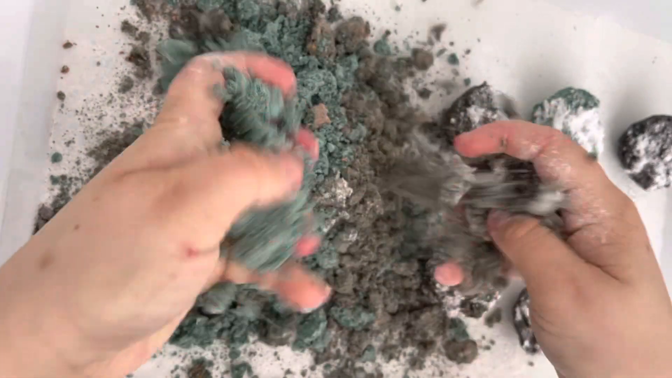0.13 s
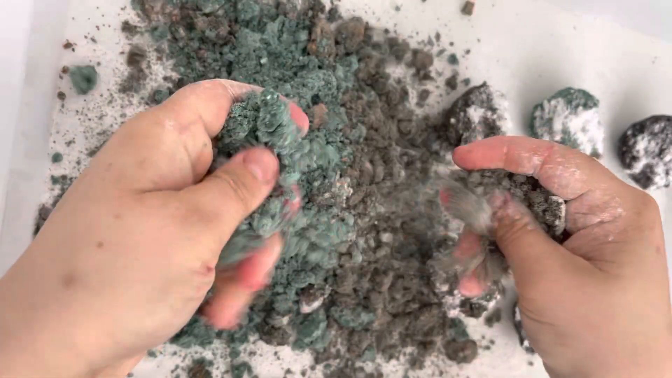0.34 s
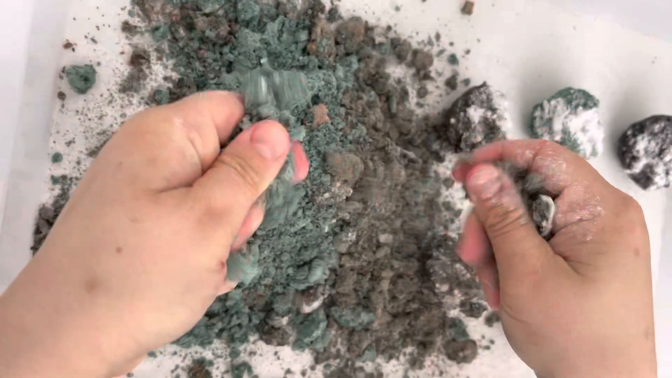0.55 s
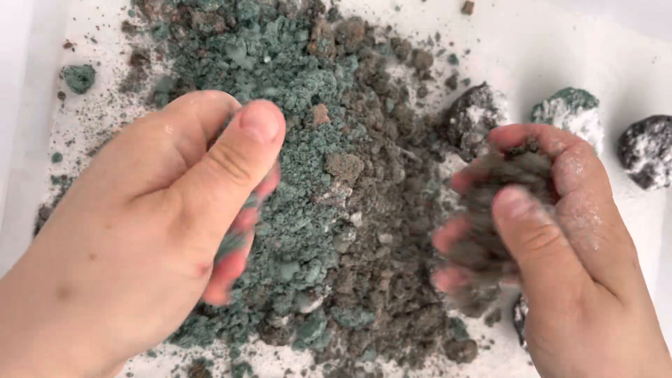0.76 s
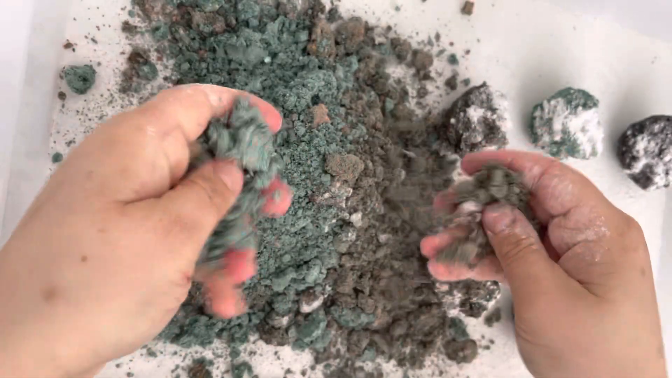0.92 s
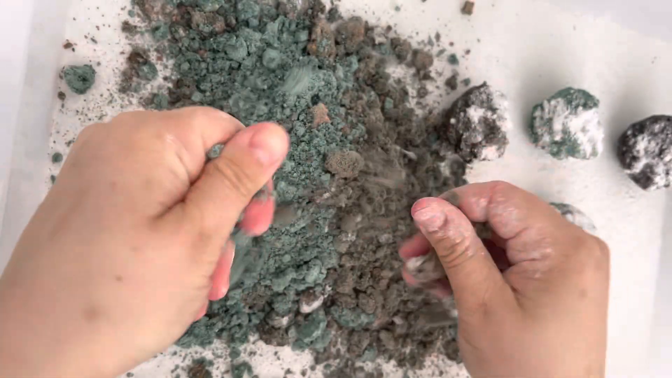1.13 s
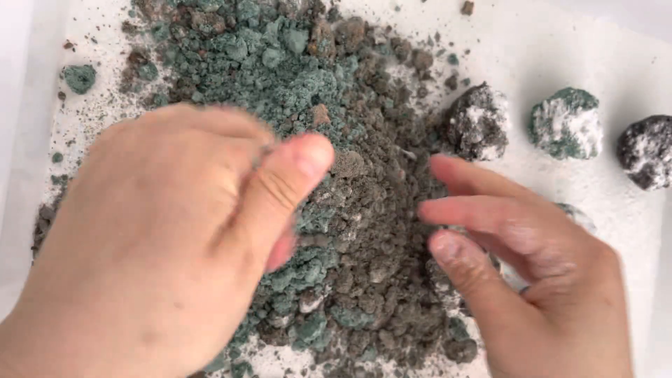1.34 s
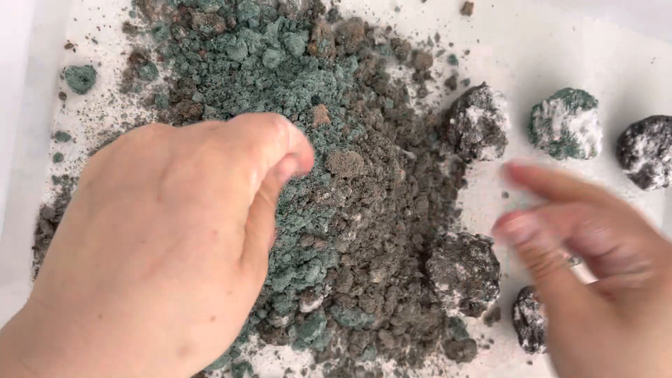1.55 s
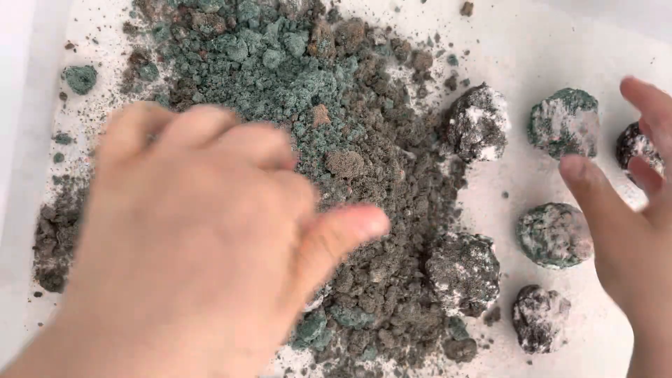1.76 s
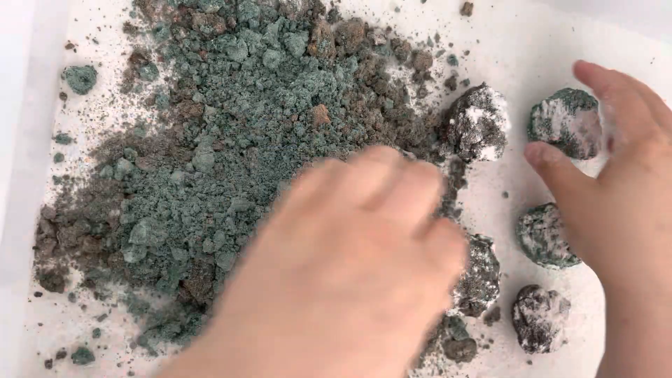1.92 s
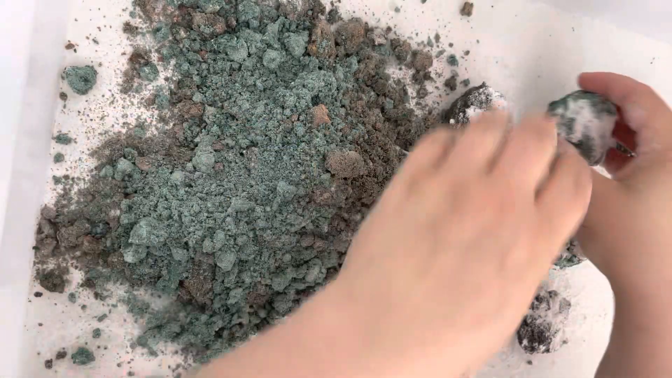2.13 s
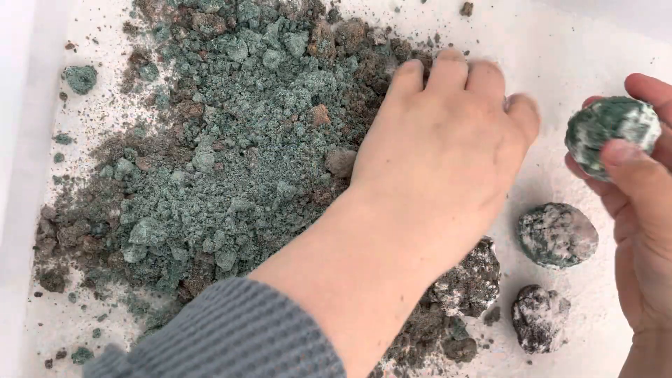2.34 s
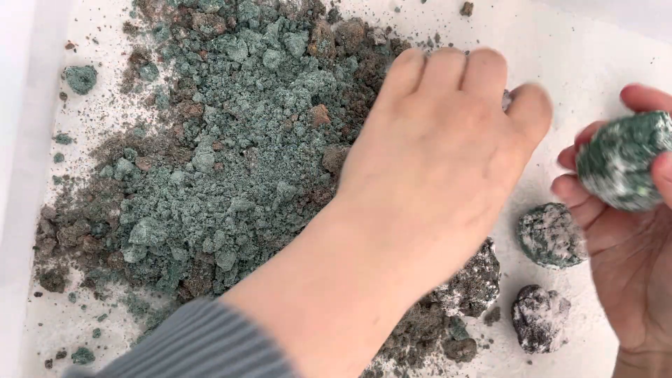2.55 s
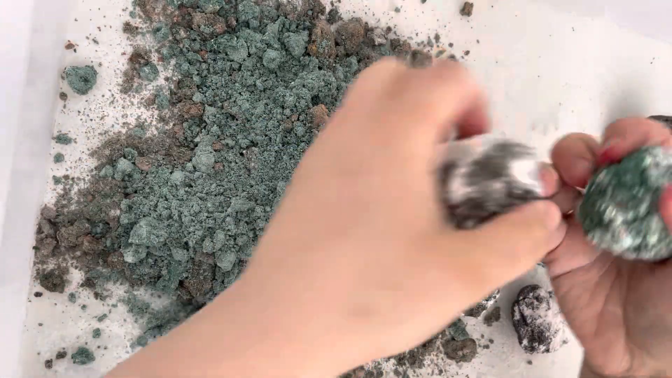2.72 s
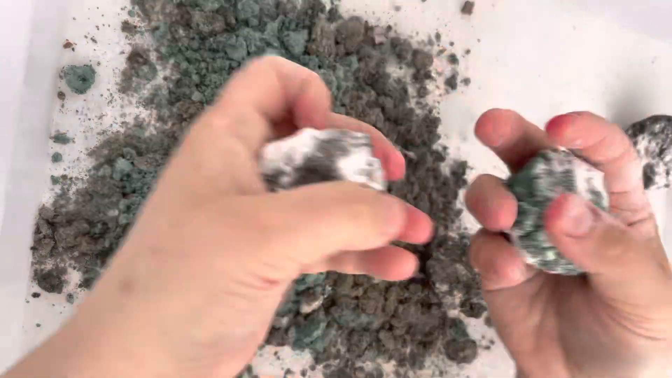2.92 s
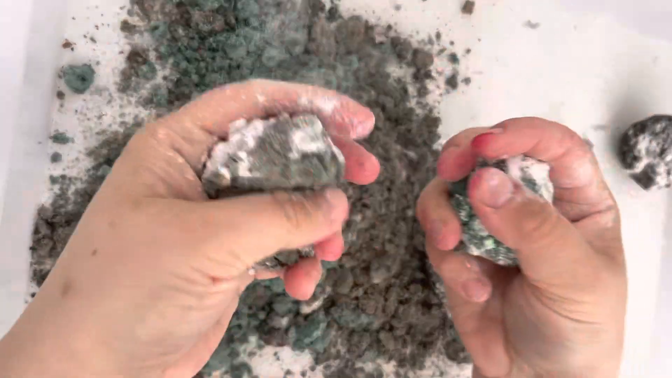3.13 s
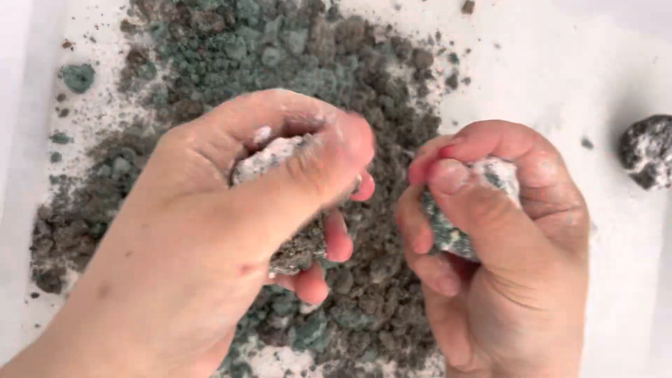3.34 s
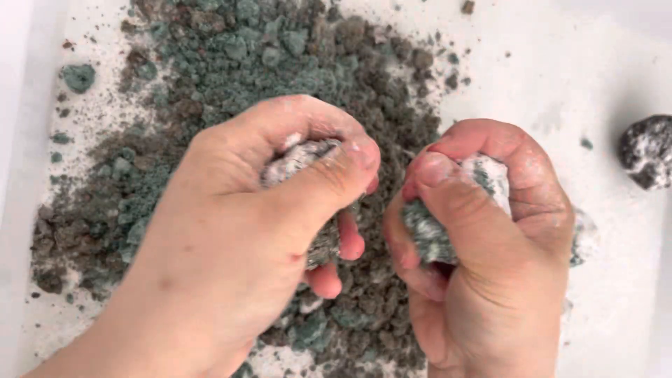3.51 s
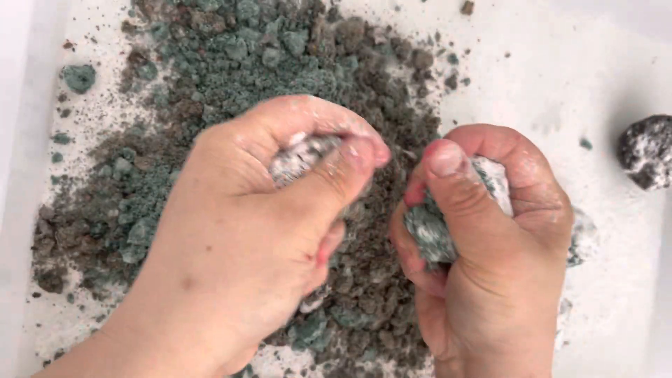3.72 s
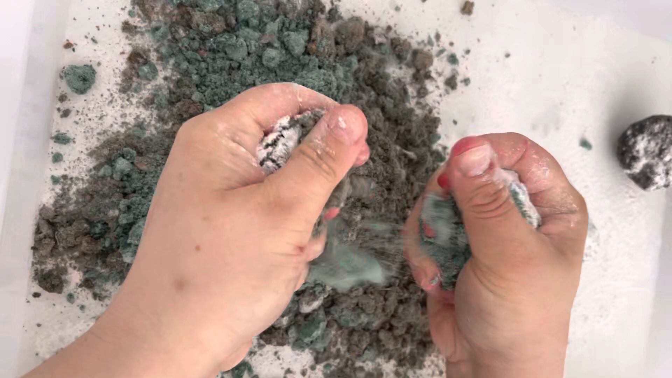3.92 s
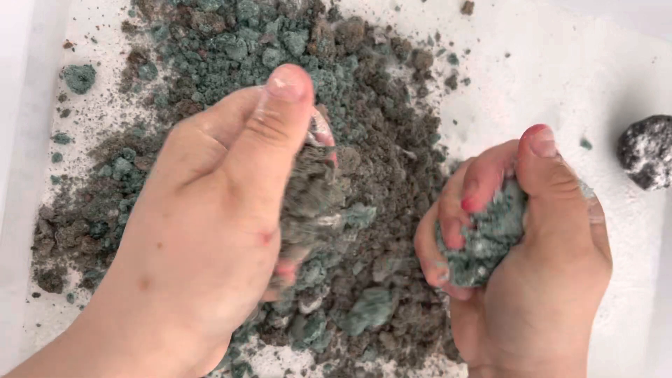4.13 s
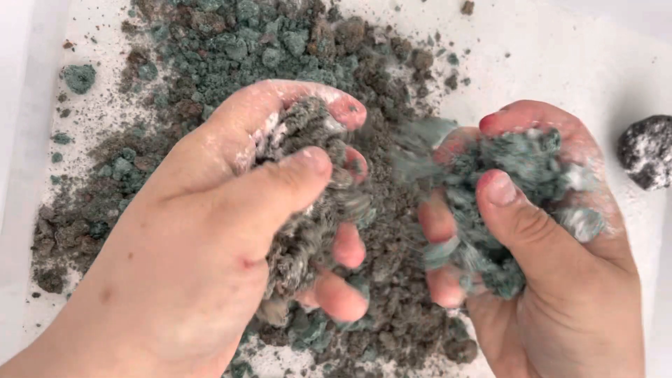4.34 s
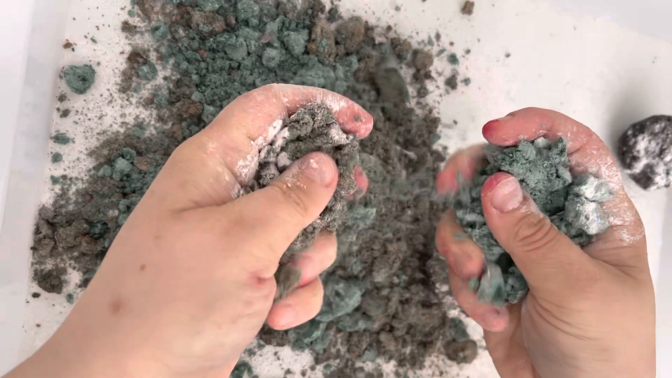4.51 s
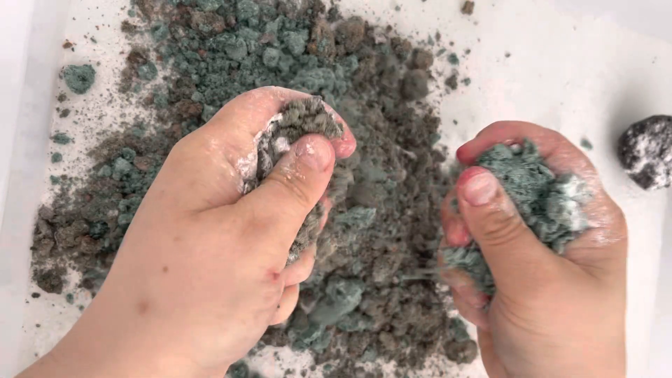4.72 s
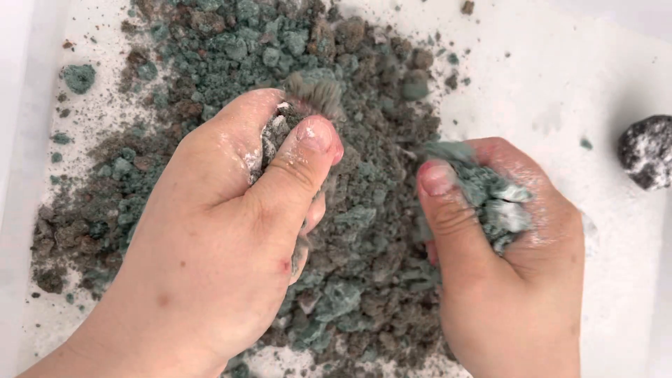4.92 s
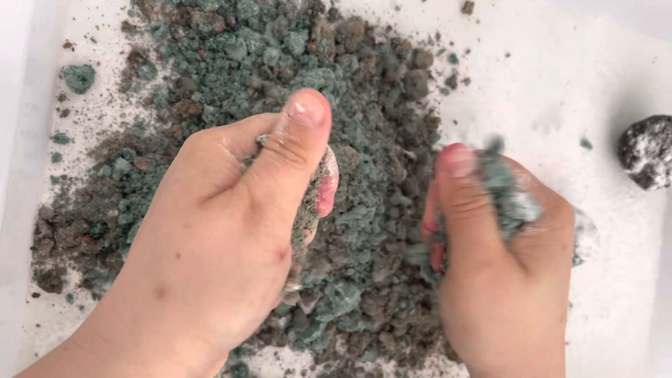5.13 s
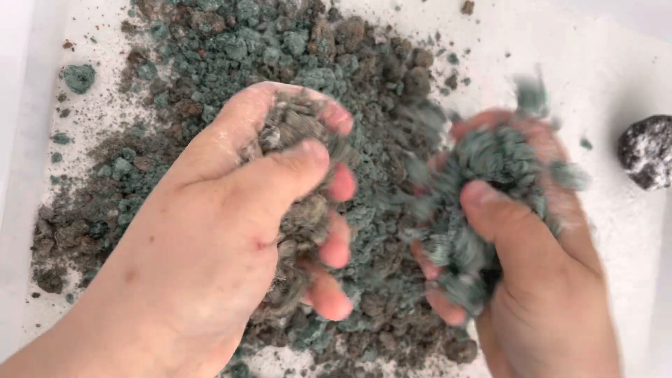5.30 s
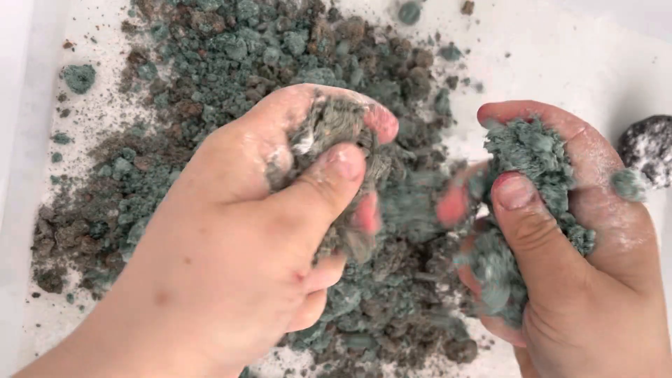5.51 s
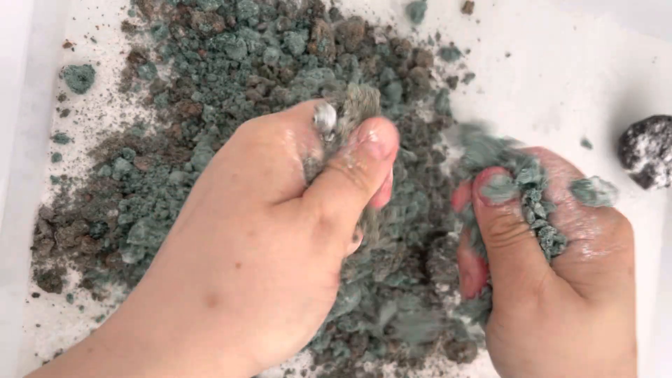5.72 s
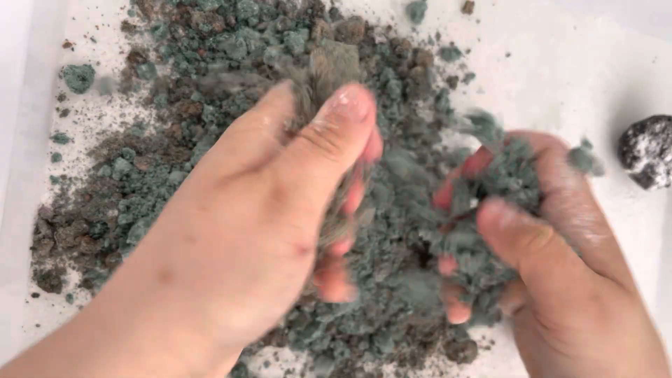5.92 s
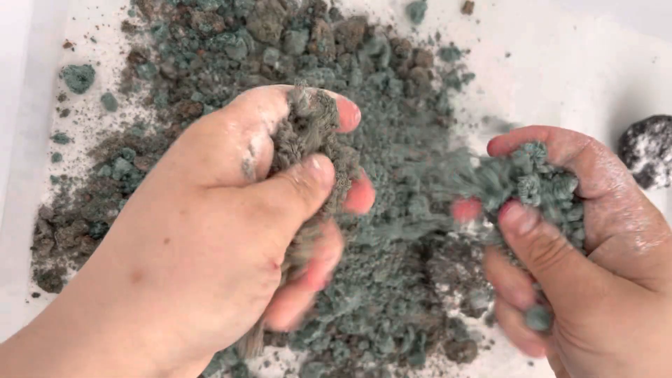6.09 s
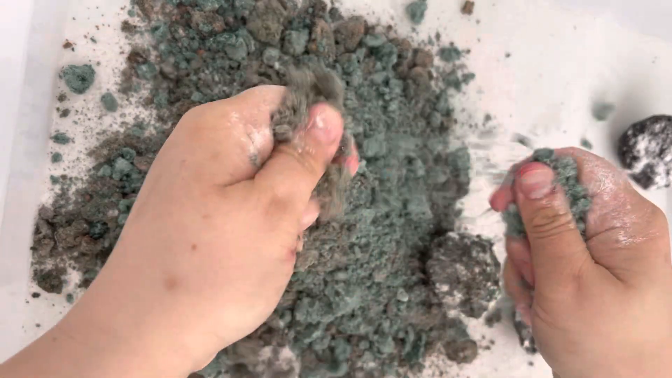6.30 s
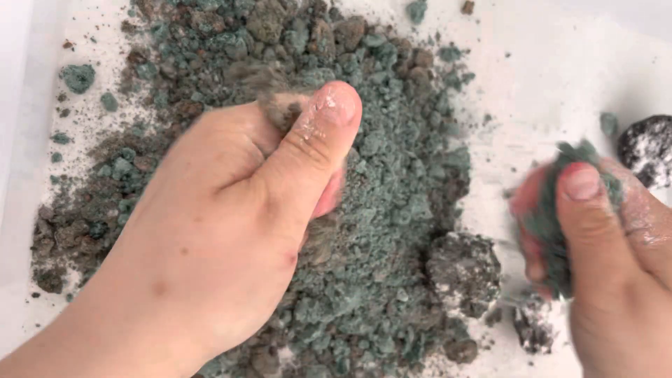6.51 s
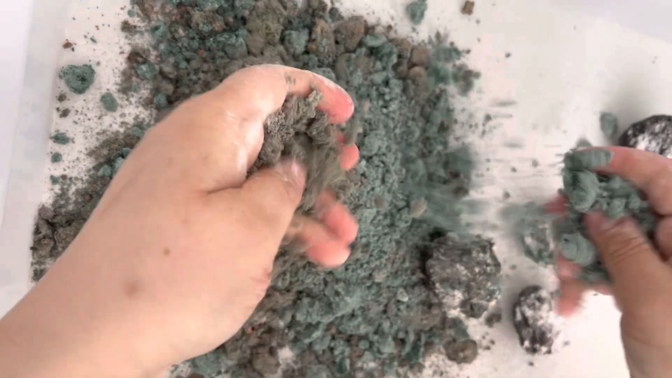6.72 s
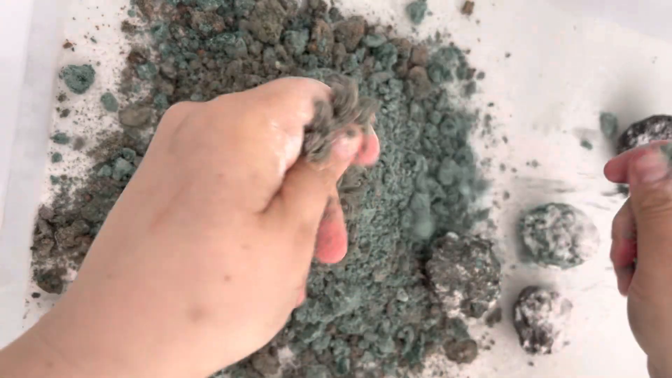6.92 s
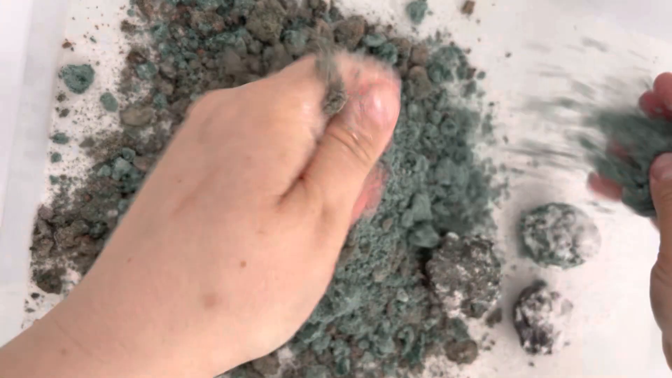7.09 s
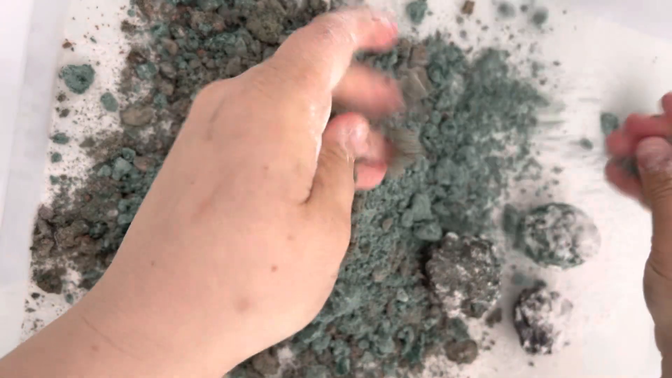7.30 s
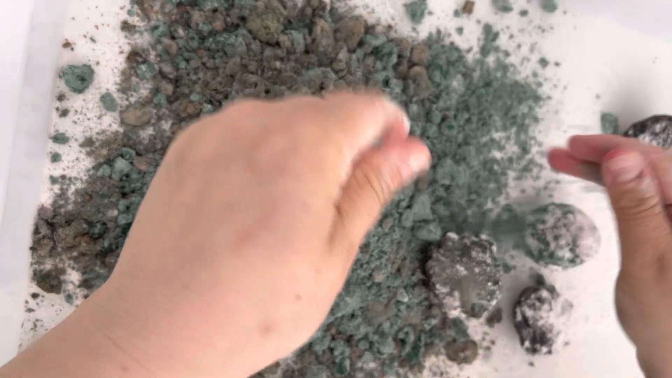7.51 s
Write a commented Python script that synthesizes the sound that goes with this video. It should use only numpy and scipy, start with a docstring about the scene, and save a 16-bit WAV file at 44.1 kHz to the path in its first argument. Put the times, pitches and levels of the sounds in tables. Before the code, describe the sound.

Two hands crush balls of dry, brittle foam close to a phone in a quiet room. Soft powdery crumbling and light taps fade into a near-silent pause with faint brushing. Then sharp snaps build quickly into a crackling collapse, followed by waves of gritty crunching. Finally heavy clumps thud onto a shallow tray and loose lumps patter down, with a low rumble of handling beneath.

```python
"""Powdery hiss, crunches and sharp snaps: two hands crush balls of dry floral foam close to a phone in a quiet room.
Shaped random grains make the hiss and crunch; noise bursts, coloured by brief tones, make the snaps.
Lumps and clumps drop on the flat tray below: noise taps and short blows over decaying sine modes.
Crumbs patter and the hands rumble low behind. Two microphone ports hear it out of step, with a faint room tail."""
import sys
import numpy as np
from scipy import signal
from scipy.fft import rfft, irfft, next_fast_len
from scipy.io import wavfile
from scipy.ndimage import uniform_filter1d

SR = 44100
rng = np.random.default_rng(int(sys.argv[2]) if len(sys.argv) > 2 else 0)


def generate_wav(signal):
    """Clip the signal to [-1, 1] and save it as 16-bit WAV at the path in sys.argv[1]."""
    frames = np.transpose(np.atleast_2d(signal))
    scaled = np.clip(frames, -1, 1) * 32767
    pcm = np.round(scaled).astype(np.int16)
    wavfile.write(sys.argv[1], SR, pcm)


N = 332955
TIME = np.arange(N) / SR  # s

# Levels are ahead of the trims in the functions; a peak is the rms of the loudest 3 ms.
# Colours give relative gain; t60 is the time to fall by 60 dB; tilt is treble gain per octave.

# squeezes, brushes and rummaging of the fingers in the foam:
# (t/s, attack/s (at least 0.001), hold/s, powder hiss level/dB, coarse crunch level/dB, buried grinding level/dB)
STROKES = [(0.0, 0.00069, 0.07, -63.5, -64.5, -61), (0.166, 0.13, 0.33, -56.5, -58.5, -61.5),
           (0.714, 0.08, 0.059, -73.5, -79, -74), (0.816, 0.21, 0.07, -53.5, -57, -79),
           (1.136, 0.046, 0.046, -66, -63.5, -60), (1.264, 0.026, 0.0091, -61, -76, -77),
           (1.374, 0.0077, 0.013, -62, -74, -96), (1.406, 0.17, 0.02, -57.5, -71.5, -92),
           (1.951, 0.03, .005, -79, -74.5, -73), (2.108, 0.075, 0.097, -77.5, -76.5, -77),
           (2.311, 0.042, 0.014, -74.5, -66, -76), (2.84, 0.1, 0.032, -59, -57, -67),
           (3.011, 0.022, 0.015, -55.5, -54.5, -59), (3.13, 0.051, 0.072, -77, -66.5, -62),
           (3.3, 0.035, .025, -82, -81, -64), (3.514, 0.063, 0.026, -60, -59.5, -57),
           (3.61, 0.067, 0.014, -52, -49, -43), (3.735, 0.057, 0.045, -51, -46.5, -44),
           (3.876, 0.038, 0.16, -55, -51, -53.5), (4.008, 0.063, 0.11, -58.5, -53.5, -70),
           (4.173, 0.059, 0.13, -60.5, -55, -64.5), (4.365, 0.07, 0.08, -64.5, -58, -85),
           (4.441, 0.071, 0.24, -57, -51, -49.5), (4.774, 0.081, 0.021, -51, -49.5, -51.5),
           (4.904, 0.038, 0.012, -53, -49.5, -48), (4.995, 0.039, 0.097, -55.5, -52.5, -57.5),
           (5.156, 0.069, 0.56, -61.5, -60.5, -64), (5.375, 0.16, 0.068, -53.5, -51, -47.5),
           (5.606, 0.082, 0.042, -50, -52.5, -52), (5.843, 0.12, 0.11, -67.5, -63, -66),
           (5.992, 0.057, 0.19, -59, -57, -49.5), (6.101, 0.11, 0.21, -54.5, -56, -52.5),
           (6.51, 0.071, 0.062, -66, -71.5, -88), (6.64, 0.07, 0.21, -57, -59, -62.5),
           (6.91, 0.087, 0.018, -54.5, -65, -61), (7.087, 0.041, 0.021, -62, -67, -61.5),
           (7.172, 0.026, 0.015, -71, -56, -45.5), (7.222, 0.11, 0.07, -59.5, -90, -76)]
RELEASE_T60_S = 0.41  # the crumbling dies away as the fingers ease
# loose crumbs between strokes: (hiss level/dB, crunch level/dB, grinding level/dB)
IDLE_DB = (-84.5, -87, -88)
# the fresh ball gives way ever faster, then is flat: time of the peak, swell before it, decay after it
CAVE_S, CAVE_SWELL_DB_PER_S, CAVE_T60_S = 3.485, 168, 0.16
# the cave-in at its peak: (hiss level/dB, crunch level/dB, grinding level/dB)
CAVE_DB = (-45, -46, -32.5)
# colour of thin cells breaking: (f/Hz, gain/dB)
POWDER = [(300, -90), (1200, -23), (2500, -18), (4200, 6), (6400, 6.5), (8000, 13.5), (10500, 15),
          (11300, 10), (12300, -10.5), (13500, -39)]
# colour of thicker walls breaking: (f/Hz, gain/dB)
CRUNCH = [(150, 2.5), (350, -4), (700, -15.5), (1000, -11.5), (1400, -1), (1800, 2), (2500, 4), (3300, -2),
          (6000, -1.5), (12000, -44)]
# colour of the crust: (f/Hz, gain/dB)
CRUST = [(150, -32.5), (600, -5.5), (1000, -20), (1700, -1.5), (2500, -1), (3500, -0.5), (5000, -1.5),
         (6500, 3), (10500, 2), (13000, -25.5)]
# colour of thick walls, muffled by the fingers: (f/Hz, gain/dB)
WALL = [(150, -22.5), (550, -21), (1080, -14.5), (1330, 2.5), (1550, -3), (1800, 0.5), (2100, -3),
        (2500, -3), (3300, -15), (6500, -12), (10500, -9), (13000, -44)]

# loudest snaps of the crust: (t/s, peak level/dB, tilt/(dB/octave), brief tone mixed into the snap f/Hz)
SNAPS = [(1.0213, -36.5, -6, 2360), (1.0682, -42, -10, 2500), (1.1338, -40, -8.5, 2400),
         (2.777, -33.5, 0.5, 2900), (3.041, -37.5, 2, 2170), (3.087, -33, 0.5, 2260),
         (3.1706, -31.5, 0, 2280), (3.1905, -35, -3.5, 2640), (3.2139, -26.5, -6.5, 2320),
         (3.228, -48, -10, 2000), (3.2544, -48, 6, 1900), (3.2591, -34, -2, 1870), (3.273, -42, -7, 2320),
         (3.2845, -26, -1, 1800), (3.3244, -45, 8, 1540), (3.351, -27.5, -4.5, 1830),
         (3.3786, -24, -3, 1770), (3.406, -31, 3, 2050), (3.412, -43, -5, 2000), (3.42, -42, 1, 2020),
         (3.426, -28.5, 2, 2530), (3.434, -36, -6, 2400), (3.4774, -24.5, 1, 1310),
         (3.4887, -25.5, -1, 1290), (3.605, -34.5, -3.5, 1340), (3.637, -34, 6, 1360),
         (3.644, -36, 7, 1830), (3.743, -32.5, -4, 1830), (3.934, -27, -1, 1790), (4.053, -32, 5, 1830),
         (4.5806, -35.5, -8, 1270), (4.71, -35, -7, 1750), (4.7388, -27, -10, 1810), (4.8625, -31, 4, 1260),
         (4.899, -29.5, 3, 1550), (4.965, -29.5, -0.5, 1800), (5.0313, -29, -4.5, 1790),
         (5.4671, -26, -10.5, 2500), (5.477, -31.5, -10.5, 2500), (5.553, -33, -6, 2270),
         (5.6989, -28, -8, 1390), (6.0233, -35.5, -8.5, 3150), (6.083, -39, -6, 2400),
         (6.0985, -28, -19, 1950)]
TONE_DB = -6  # brief tone against the crack
# thick walls giving way inside the fist: (t/s, peak level/dB, tilt/(dB/octave))
CRUNCHES = [(3.445, -36, 5), (3.452, -30, -5), (3.461, -31.5, 4), (3.468, -27, 0), (3.479, -31, -6),
            (3.488, -31.5, -12), (3.646, -40.5, 0), (3.688, -36.5, 1), (3.707, -40, 5), (3.728, -47, 8),
            (3.765, -42, 3), (3.82, -33.5, -1.5), (3.843, -39, 5), (3.851, -39, 0), (3.906, -41, 6),
            (3.971, -40, 15), (4.006, -39, 14), (4.035, -39, 4), (4.112, -38, 6), (4.148, -37.5, 4.5),
            (4.176, -39, 1.5), (4.329, -48, -1), (4.411, -52, -2), (4.43, -48, -1), (4.455, -47.5, 1),
            (4.486, -48, -8), (4.494, -40, -4), (4.516, -35, -0.5), (4.525, -40, -1), (4.544, -37, 1.5),
            (4.566, -39, -6), (4.6, -38.5, -6), (4.609, -40, 0), (4.645, -43, -10), (4.659, -37.5, 2),
            (4.682, -42, -1), (4.705, -33, -5), (4.752, -44, -10), (4.772, -44, 0), (4.818, -41, 1),
            (4.854, -36.5, 0), (4.875, -39.5, 2), (4.943, -44, 3), (5.106, -57, 4), (5.147, -40.5, 9),
            (5.386, -44, -3.5), (5.644, -39, 0)]
# broken halves knocking together inside the fist: (t/s, peak level/dB, f/Hz)
KNOCKS = [(3.088, -41, 587), (3.286, -41, 560), (3.362, -43, 650), (3.383, -45, 596), (3.454, -30, 600),
          (3.608, -39, 566), (3.645, -30, 645), (3.656, -36, 620), (3.744, -37, 590), (3.847, -35.5, 533),
          (3.909, -38, 680), (4.7415, -43, 600), (4.965, -43, 550), (5.033, -31, 610)]
# packed core creaking in the fist: (t/s, attack/s, hold/s, level/dB)
CREAKS = [(3.304, 0.039, 0.04, -51.5), (3.653, 0.027, 0.041, -68), (3.805, 0.035, 0.027, -48.5),
          (3.919, 0.013, 0.015, -46.5), (3.996, 0.023, 0.041, -52)]
# colour of the packed core: (f/Hz, gain/dB)
CORE = [(80, -21), (200, -2), (330, 9.5), (550, -0.5), (800, -3.5), (2000, -39), (8000, -73)]
# fingers brushing the foam and picking up a ball: (t/s, length/s, level/dB)
SCRAPES = [(1.658, 0.068, -66.5), (1.997, 0.031, -67), (2.462, 0.07, -61), (2.522, 0.18, -56),
           (2.662, 0.043, -47.5), (2.683, 0.15, -57.5), (2.764, 0.036, -45.5), (2.793, 0.028, -61),
           (2.816, 0.077, -59)]
# colour of skin on crust: (f/Hz, gain/dB)
RASP = [(600, -43), (1500, -12.5), (2200, 0), (2800, 3.5), (3800, -4), (5000, -2), (8000, 2.5),
        (10500, 6.5), (13000, -35)]

# lumps landing on the tray: (t/s, peak level/dB, low ring peak level/dB, hardness as tilt/(dB/octave))
LUMPS = [(0.039, -58, -54.5, -9), (0.134, -53, -52, 19.5), (0.178, -51, -64, 6), (0.228, -40, -48.5, -12),
         (0.243, -44, -52, -4), (0.444, -43.5, -74, 15), (0.6, -41.5, -54, 23.5), (0.75, -33.5, -56.5, -3),
         (0.797, -54, -76, 6), (0.828, -45, -55, -2), (1.022, -32.5, -76, 17.5), (1.066, -40.5, -77, 15),
         (1.133, -41.5, -52, 11.5), (1.256, -49.5, -54.5, 1), (3.492, -35, -62, -5),
         (5.718, -30.5, -53, -10), (5.911, -46, -58, 5), (5.969, -46.5, -64, -3), (6.024, -32.5, -54, -2.5),
         (6.204, -26, -49, -7), (6.26, -32.5, -71, -1), (6.268, -40, -49, -2), (6.275, -29, -46, -9),
         (6.306, -47, -66, -6), (6.366, -43.5, -57, 18), (6.426, -39.5, -52, 0), (6.445, -41, -55, 6),
         (6.67, -42.5, -49, -27), (6.714, -42.5, -56, -4), (6.727, -35, -49, 2.5), (6.846, -45, -46, 1),
         (6.863, -36.5, -45, -3), (6.899, -32, -67, 6), (6.99, -43, -62, -1), (7.109, -47.5, -69, -3),
         (7.144, -41.5, -64, 14.5), (7.157, -37, -53, 8), (7.209, -26.5, -43, -5), (7.222, -36, -56, 9),
         (7.231, -39, -58, 0), (7.241, -38, -43, -8), (7.256, -37, -48, 8), (7.289, -28, -39.5, 4.5),
         (7.302, -28, -46, -8), (7.34, -31, -68, 8), (7.411, -43.5, -74, 4.5), (7.478, -47.5, -54.5, -7),
         (7.494, -45.5, -51, 12.5)]
REBOUND_S, REBOUND_DB = 0.0081, -7  # typical wait until broken pieces land again; start of it against the first
LUMP_BODY_DB = 2.5  # lift of the low mids in every tap
# heavy clumps landing and collapsing on the tray: (t/s, peak level/dB, contact f/Hz,
# delay of second blow/s, its peak level/dB, slump peak level/dB, low ring peak level/dB)
CLUMPS = [(5.468, -25, 1154, 0.0046, -23, -42, -49), (5.7012, -20.5, 1300, 0.005, -28.5, -29, -35),
          (6.0988, -15, 1500, 0.0075, -24, -23.5, -32)]
SECOND_PITCH = 0.89  # the broken clump lands softer: pitch against the first contact
SLUMP_S, SLUMP_HZ = 0.01, 520  # then its mass settles with a dull thud, this long after the first contact
SETTLE_DB, SETTLE_T60_S = -5.5, 0.053  # its crumbs run out: against the tabled slump level; decay
# hands and heavy clumps nudging the tray: (t/s, peak level/dB)
NUDGES = [(0.116, -54), (0.271, -51), (1.31, -47.5), (2.379, -47), (4.007, -55), (4.504, -50.5)]
# colour of a tap on the tray: (f/Hz, gain/dB)
TAP = [(30, -57), (100, 5), (300, -1), (430, -6), (550, -8), (800, -5), (1100, 2.5), (1500, 2.5),
       (1900, -9), (2600, -16), (3400, -31), (8000, -49), (13000, -77)]
# low modes of the tray, before tilt and scatter: (f/Hz, level/dB, t60/s)
TRAY = [(137.5, 4.5, 0.33), (195.5, -5, 0.22), (239.6, -8.5, 0.3), (288.8, -12, 0.34), (349.2, -16.5, 0.32),
        (438, -13.5, 0.18), (529.7, -10.5, 0.17)]
# quick upper modes of its floor, before tilt and scatter: (f/Hz, level/dB, t60/s)
PANEL = [(413, -4.5, 0.09), (551.5, 5, 0.087), (745, 3.5, 0.11), (883, 8.5, 0.05), (1042, 8, 0.057),
         (1167, 7, 0.057), (1245, 1, 0.093), (1398, 3.5, 0.049), (1552, -2.5, 0.057), (1900, -11, 0.021)]

# crumbs that trail each lump and clump: level against its tabled peak, before the patter's trim
SHOWER_DB, SHOWER_ATTACK_S, SHOWER_T60_S = -28.5, 0.016, 0.48
# colour of pattering crumbs: (f/Hz, gain/dB)
PATTER = [(30, -35), (100, -21), (200, -5), (340, 3.5), (430, -4), (540, 5), (700, 0.5), (850, 2.5),
          (1020, -3), (1350, 3.5), (1900, -8.5), (3500, -22.5), (9000, -52)]
# a hand pressing on the heap: (t/s, attack/s, hold/s, level/dB)
PRESSES = [(1.578, 0.022, 0.052, -55)]
# colour of the shifting heap: (f/Hz, gain/dB)
HEAP = [(40, -8), (150, -3), (300, -1.5), (400, 0.5), (500, 4), (620, -7.5), (900, -12), (1300, -13),
        (3000, -28), (6000, -54)]
# low rumble of the hands over time: (t/s, level/dB)
HANDLING = [(0.0, -46), (0.45, -59), (1.05, -56), (1.42, -50), (1.8, -55), (2.05, -56), (2.4, -53),
            (2.92, -56), (3.2, -47), (4.2, -54), (4.4, -61), (4.8, -56), (5.4, -52.5), (5.74, -51),
            (5.95, -54.5), (6.12, -57), (6.6, -52), (6.89, -52.5), (7.55, -55)]
# colour of that rumble: (f/Hz, gain/dB)
RUMBLE = [(22, -35.5), (36, -4), (64, 2.5), (82, 1.5), (100, -3), (118, -4.5), (138, 2), (165, -11.5),
          (250, -16), (500, -31), (1200, -38.5), (8000, -67)]
# phase by which the left microphone port leads the right: (f/Hz, phase/rad)
PORTS = [(0, 0), (150, 0.08), (300, 0.4), (600, 1.15), (780, 0.9), (1000, 0.35), (1380, -0.1), (2240, 0.1),
         (2930, 1.0), (3700, 0.4), (4570, 1.8), (5340, 5.4), (5680, 6.2), (6200, 6.3), (8350, 9.2),
         (9560, 9.6), (11800, 12.2), (12500, 12.7)]
TOP_HZ = 13200  # upper edge of the phone's band


def crumbling(hiss_gain, crunch_gain):
    """Thin cells break as dense hiss, thick walls as sparser crunch and dull clots, crust flakes as crackles."""
    powder = unit(colour(grains(rate=20000, spread_db=2.0, surge_db=1.5, surge_rate=670), POWDER))
    crunch = unit(colour(grains(rate=3200, spread_db=2.5, surge_db=2.5, surge_rate=170), CRUNCH))
    flakes = grains(rate=170, spread_db=2, surge_db=2.5, surge_rate=25)
    # each flake tears for a few milliseconds
    tearing = signal.oaconvolve(np.abs(flakes), fade(TIME[:300], t60=0.004))[:N]
    crackle = undb(-4) * unit(colour(tearing * rng.standard_normal(N), CRUST))
    clots = undb(-5) * unit(colour(grains(rate=260, spread_db=1.5, surge_db=3, surge_rate=40), WALL))
    coarse = crunch + crackle + clots
    return undb(6.0) * powder * hiss_gain + undb(-0.85) * coarse * crunch_gain


def effort():
    """Gains of hiss, crunch and grinding over time: idle crumbs, finger strokes and cave-in add in power."""
    power = undb(IDLE_DB)[:, None] ** 2 + np.outer(undb(CAVE_DB), cave_in()) ** 2
    for s, attack, hold, hiss_db, crunch_db, grind_db in STROKES:
        push = stroke(s, attack, hold, RELEASE_T60_S)
        power += np.outer(undb([hiss_db, crunch_db, grind_db]) ** 2, push ** 2)
    return np.sqrt(power)


def cave_in():
    """Each broken wall overloads the next, so the collapse swells steadily in dB and ends abruptly."""
    since = TIME - CAVE_S
    swell = undb(CAVE_SWELL_DB_PER_S * np.minimum(since, 0))
    return swell * fade(np.maximum(since, 0), CAVE_T60_S)


def snaps():
    """A crack runs through the crust in a few milliseconds and sheds a little grit; a brief tone colours each snap."""
    out, t = np.zeros(N), TIME[:2048]
    onset = (1 - np.exp(-t / 0.00052)) ** 2
    shape = onset * (fade(t, t60=0.0048) + undb(-26) * fade(t, t60=0.06))  # crack, then grit
    for s, db, treble_db, hz in SNAPS:
        crack = colour(rng.standard_normal(len(t)) * shape, CRUST, treble_db)
        tone = shape * np.sin(2 * np.pi * hz * t)
        add(out, s, to_peak(unit(crack) + undb(TONE_DB) * unit(tone), db - 4.0))
    return out


def crunches():
    """Thick walls buckle with short, dull cracks; all share nearly the same hollow colour, slightly varied at random."""
    out, t = np.zeros(N), TIME[:2048]
    onset = (1 - np.exp(-t / 0.0008)) ** 2
    shape = onset * (fade(t, t60=0.008) + undb(-30) * fade(t, t60=0.05))
    for s, db, treble_db in CRUNCHES:
        shift = 2 ** (.04 * rng.standard_normal())
        hollow = [(hz * shift, gain_db) for hz, gain_db in WALL]
        crack = colour(rng.standard_normal(len(t)) * shape, hollow, treble_db)
        add(out, s, to_peak(crack, db - 2))
    return out


def knocks():
    """Broken halves meet in a dull knock, damped at once by the palm."""
    out, t = np.zeros(N), TIME[:1500]
    for s, db, hz in KNOCKS:
        add(out, s, to_peak(contact(hz, t), db - 7.5))
    return out


def creaks():
    """Under a hard squeeze the packed core slips in low, uneven jerks."""
    slips = unit(colour(grains(rate=450, spread_db=-3.5, surge_db=2.0, surge_rate=76), CORE))
    return slips * sum(undb(db) * stroke(s, attack, hold, t60=0.071) for s, attack, hold, db in CREAKS)


def scrapes():
    """Skin drags over the rough crust: a short, bright rasp."""
    gain = np.zeros(N)
    rasp = unit(colour(grains(rate=12000, spread_db=1.5, surge_db=2.5, surge_rate=200), RASP))
    for s, length, db in SCRAPES:
        across = 2 * (TIME - s) / length - 1  # -1 to 1 over the stroke
        gain += undb(db) * np.sqrt(np.maximum(1 - across ** 2, 0))
    return rasp * gain


def lumps():
    """Each lump taps the tray, breaks up and scatters, and the tray rings low."""
    out, t, long_t = np.zeros(N), TIME[:6000], TIME[:16000]
    # every lump has some body, a hard one more treble
    body = [(200, 0), (450, LUMP_BODY_DB), (800, LUMP_BODY_DB), (1300, 0)]
    for s, db, ring_db, bright_db in LUMPS:
        again = t - REBOUND_S * rng.uniform(.6, 1.4)
        rebound = undb(REBOUND_DB) * (again > 0) * fade(np.abs(again), t60=0.02)
        landing = fade(t, t60=0.015) + rebound
        scatter = undb(-9) * fade(t, t60=0.065) + undb(-31) * fade(t, t60=0.19)
        pieces = rng.standard_normal(len(t)) * undb(4 * walk(rate=400)[:len(t)])
        tap = unit(colour(pieces * (landing + scatter), TAP))
        panel = modes(PANEL, t, tilt_db=4, vary_db=4.5, vary_pitch=0.018) * (1 - np.exp(-t / 0.0011))
        tap += undb(-3.5) * unit(panel)
        tap = bend(colour(tap, body, bright_db), lag=0.003454)
        add(out, s - .001, to_peak(tap, db - 5.5))
        add(out, s, to_peak(tray_ring(long_t, tilt_db=2.5), ring_db))
    return out


def clumps():
    """A clump hits, breaks, hits again and slumps; each softer blow rings lower modes of the tray."""
    out, t, long_t = np.zeros(N), TIME[:8000], TIME[:16000]
    for s, db, hz, delay, second_db, slump_db, ring_db in CLUMPS:
        blows = [(0, db, hz), (delay, second_db, hz * SECOND_PITCH), (SLUMP_S, slump_db, SLUMP_HZ)]
        for after, blow_db, blow_hz in blows:
            push = contact(blow_hz, t)
            panel = modes(PANEL, t, tilt_db=-8.5, vary_db=2.5, vary_pitch=0.012)
            ring = signal.fftconvolve(push, panel)[:len(t)]
            add(out, s + after, to_peak(unit(push) + undb(1.5) * unit(ring), blow_db - 2.5))
        crumbs = colour(rng.standard_normal(len(t)) * fade(t, SETTLE_T60_S), TAP)
        add(out, s + delay, to_peak(crumbs, slump_db + SETTLE_DB))
        add(out, s, to_peak(tray_ring(long_t, tilt_db=1.0), ring_db))
    return out


def nudges():
    """A soft nudge stirs chiefly the lowest modes of the tray."""
    out, t = np.zeros(N), TIME[:16000]
    for s, db in NUDGES:
        ring = tray_ring(t, tilt_db=-11.5) * fade(t, t60=0.56)  # damped beyond the tabled t60
        add(out, s, to_peak(ring, db))
    return out


def patter(grind_gain):
    """Crumbs grind in the fist and shower down after each lump and clump, as sparse grains."""
    crumbs = unit(colour(grains(rate=2200, spread_db=2.0, surge_db=4.0, surge_rate=110), PATTER))
    showers = np.zeros(N)
    trail = stroke(0, SHOWER_ATTACK_S, 0, SHOWER_T60_S)[:SR]
    for s, db, *_ in LUMPS + CLUMPS:
        add(showers, s, undb(db + SHOWER_DB) * trail)
    return undb(-3.5) * crumbs * np.hypot(grind_gain, showers)


def heap():
    """Crumbs shift dully in the heap under a pressing hand."""
    crumbs = unit(colour(grains(rate=3300, spread_db=-2.5, surge_db=-0.5, surge_rate=43), HEAP))
    return crumbs * sum(undb(db) * stroke(s, attack, hold, RELEASE_T60_S) for s, attack, hold, db in PRESSES)


def handling():
    """Dull rumble, low-coloured noise, as the hands work above the table."""
    return undb(-3.0) * unit(colour(rng.standard_normal(N), RUMBLE)) * curve(HANDLING)


def ports(x):
    """The sound reaches the two microphone ports out of step: half the phase each way."""
    size = next_fast_len(N + 2048)
    lead = np.interp(np.fft.rfftfreq(size, 1 / SR), *np.transpose(PORTS))
    return irfft(rfft(x, size) * np.exp(.5j * np.array([lead, -lead])), size)[:, :N]


def room(x):
    """Reflections off the moving hands come and go; the room adds a faint tail."""
    x = signal.sosfilt(signal.butter(1, [200, 6000], "band", fs=SR, output="sos"), x)
    # a hand is too small to reflect the bass
    small = signal.sosfilt(signal.butter(2, 300, "high", fs=SR, output="sos"), x)
    hands = undb(-15) * sum(echo(small, t60=.009) * walk(rate=14) for _ in range(3))
    return hands + undb(-26) * echo(x, t60=0.94)


def echo(x, t60):
    """A burst of reflections with about the energy of the source, different at each port."""
    t = TIME[:int(t60 * SR)]
    burst = rng.standard_normal((2, len(t))) * fade(t, t60)
    return signal.oaconvolve(x[None], unit(burst) / np.sqrt(len(t)), axes=1)[:, :N]


def tray_ring(t, tilt_db):
    """The low modes swell as the wave fills the tray, then ring on."""
    return modes(TRAY, t, tilt_db, vary_db=3.5, vary_pitch=0.013) * (1 - np.exp(-t / 0.0095)) ** 2


def modes(table, t, tilt_db, vary_db, vary_pitch):
    """Ringing modes; random phase and strength stand for the spot that is hit, random detuning for its load."""
    hz, db, t60 = np.transpose(table)[:, :, None]
    phase, strength, detune = rng.uniform(-1.195, 1, (3, len(table), 1))
    size = undb(db + vary_db * strength + tilt_db * np.log2(hz / hz[0]))
    tone = np.sin(2 * np.pi * hz * (1 + vary_pitch * detune) * t + np.pi * phase)
    return (size * fade(t, t60) * tone).sum(0)


def contact(hz, t):
    """A short, rounded blow of about one and a half cycles; softer means lower."""
    cycles = hz * t
    return cycles * np.exp(-cycles / 0.62) * np.sin(2 * np.pi * cycles)


def bend(x, lag):
    """Bending waves in a sheet: the lows travel slower; the delay is half of lag at 1 kHz, nil at 4 kHz."""
    khz = np.fft.rfftfreq(2 * len(x), 1 / SR) / 1000
    cycles = lag * 1000 * (2 * np.sqrt(khz) - khz / 2)
    return irfft(rfft(x, 2 * len(x)) * np.exp(-2j * np.pi * cycles))[:len(x)]


def grains(rate, spread_db, surge_db, surge_rate):
    """Random tiny fractures in surges; a positive spread makes a few far bigger, a negative one far smaller."""
    size = undb(spread_db * np.minimum(rng.exponential(size=N), 5))
    clicks = (rng.random(N) < rate / SR) * size * rng.choice([-1, 1], N)
    return clicks * undb(surge_db * walk(surge_rate))


def stroke(s, attack, hold, t60):
    """A push that builds up, holds and dies away."""
    t = TIME - s
    return np.clip(t / max(attack, .001), 0, 1) ** 1.13 * fade(np.maximum(t - attack - hold, 0), t60)


def walk(rate):
    """Smooth random wander with a spread near 1, rate turns per second."""
    hold = int(SR / rate)
    steps = rng.standard_normal(N // hold + 1)
    return uniform_filter1d(np.repeat(steps, hold), hold)[:N]


def colour(x, points, tilt_db=0):
    """Causal (minimum-phase) filter through (f/Hz, gain/dB) points, tilted per octave about 1.5 kHz."""
    size = 8192
    octave = np.log2(np.maximum(np.fft.rfftfreq(size, 1 / SR), 1))
    hz, db = np.transpose(points)
    tilt = tilt_db * np.clip(octave - np.log2(1500), -.5, 2)
    gain = undb(np.interp(octave, np.log2(hz), db) + tilt)
    # folding the cepstrum forward in time gives the causal phase
    cepstrum = irfft(np.log(gain))
    cepstrum[1:size // 2] *= 2
    cepstrum[size // 2 + 1:] = 0
    return signal.oaconvolve(x, irfft(np.exp(rfft(cepstrum))))[:len(x)]


def fade(t, t60):
    """Exponential decay by 60 dB in t60."""
    return np.exp(-np.log(1000) * t / t60)


def undb(db):
    """Decibels to gain."""
    return 10 ** (np.asarray(db) / 20)


def unit(x):
    """Scale to rms 1."""
    return x / np.sqrt(np.mean(x ** 2))


def curve(table):
    """Gain over time from (t/s, level/dB) points."""
    return undb(np.interp(TIME, *np.transpose(table)))


def to_peak(x, db):
    """Scale so that the loudest 3 ms have this rms level."""
    return x * undb(db) / np.sqrt(uniform_filter1d(x ** 2, size=132).max())


def add(out, s, x):
    """Mix a sound in at a time."""
    start = max(int(s * SR), 0)
    out[start:start + len(x)] += x[:N - start]


def scene():
    """Foam and tray in front of the two ports, with the room around them."""
    hiss_gain, crunch_gain, grind_gain = effort()
    foam = crumbling(hiss_gain, crunch_gain) + snaps() + crunches() + knocks() + creaks() + scrapes()
    tray = lumps() + clumps() + nudges()
    close = foam + tray + patter(grind_gain) + heap()
    return ports(close + handling()) + room(close)


def record(dry):
    """The right port hears a little more of the low notes, the left less; the phone cuts both ends."""
    bass = signal.sosfilt(signal.butter(1, [110, 480], "band", fs=SR, output="sos"), dry)
    sound = dry + 0.23 * np.array([[-1], [1]]) * bass
    sound = signal.sosfilt(signal.butter(3, 32, "high", fs=SR, output="sos"), sound)
    return signal.sosfilt(signal.ellip(8, .2, 70, TOP_HZ, fs=SR, output="sos"), sound)


dry = scene()
out = record(dry)
generate_wav(out)
```